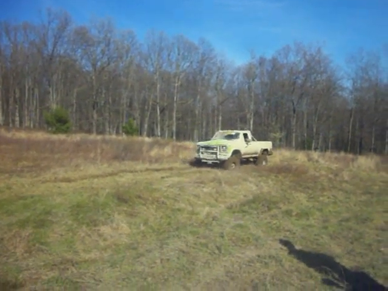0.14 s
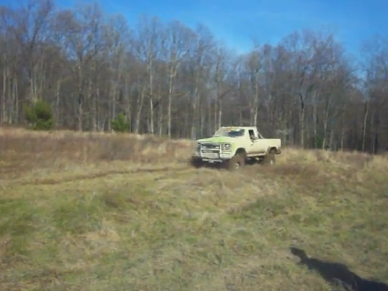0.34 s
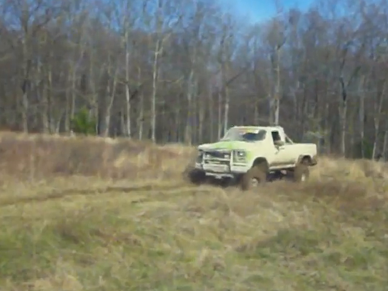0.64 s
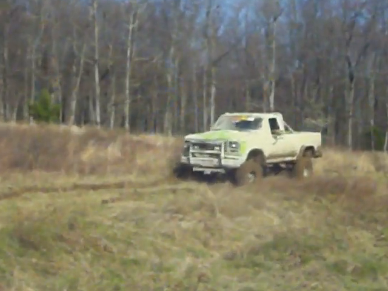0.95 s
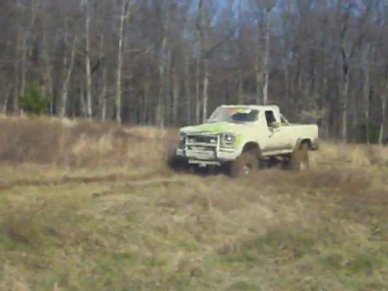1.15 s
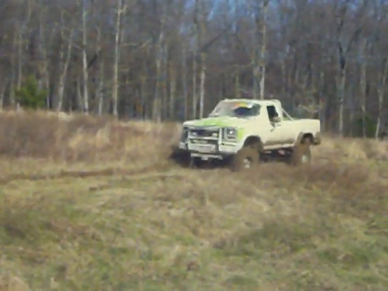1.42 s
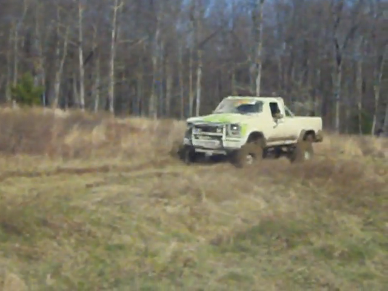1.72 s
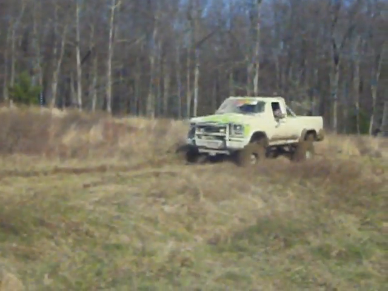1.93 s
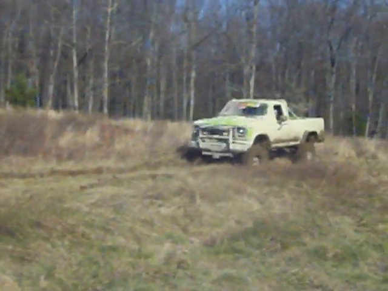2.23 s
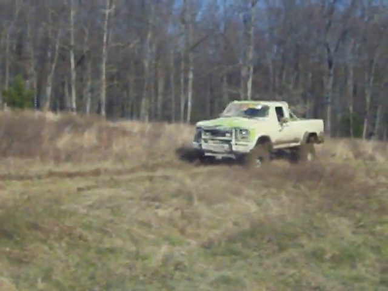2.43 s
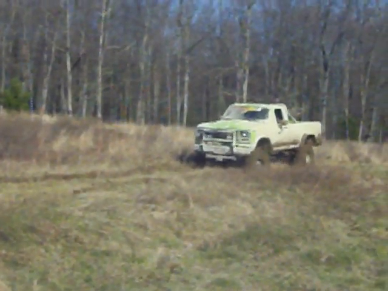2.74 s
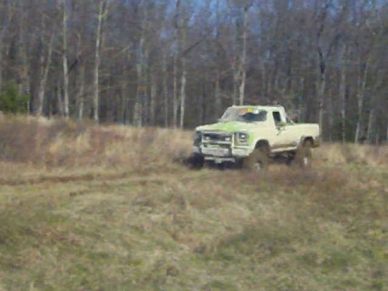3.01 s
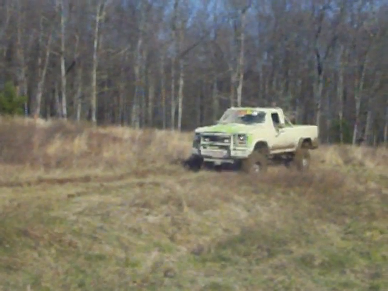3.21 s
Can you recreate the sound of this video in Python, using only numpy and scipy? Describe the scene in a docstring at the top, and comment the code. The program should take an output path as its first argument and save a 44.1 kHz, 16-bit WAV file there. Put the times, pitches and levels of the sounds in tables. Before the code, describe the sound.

A pickup's big engine revs once from idle and drops back, sputtering unevenly.

```python
"""A V8 pickup idles, is revved for a second and sinks back to a lumpy idle. Each firing sends a thump
and a rasp down the exhaust pipe, and one bank of cylinders spits through a leak.
A smaller engine drones nearby, slowly gaining speed and echoing off a line of trees.
A camera clicks three times. Underneath, fans and valves whirr and light wind rumbles on the microphone."""
import sys
import numpy as np
from scipy import signal
from scipy.fft import rfft, irfft
from scipy.io import wavfile

SR = 44100
rng = np.random.default_rng(int(sys.argv[2]) if len(sys.argv) > 2 else 0)


def persist_wave(psi):
    """Save psi, clipped to +-1, as 16-bit WAV."""
    counts = np.round(np.clip(psi, -1, 1) * 32767).astype(np.int16)
    wavfile.write(sys.argv[1], SR, np.atleast_2d(counts).T)


N = 148617
T = np.arange(N) / SR


def truck():
    """Each firing pushes out gas: a low thump, a rough rasp and, on the leaky side, a bright spit."""
    # how fast the V8 runs: (time [s], firings [per second])
    firing_rate = [(0, 29.2), (.79, 29.2), (.87, 62), (1, 73.3), (1.45, 74.43), (1.8, 75.14), (1.9, 73.7),
                   (2.1, 70.2), (2.42, 35.2), (2.55, 37.3), (2.7, 28.9), (3, 31.5), (3.37, 26)]
    # the eight firings of one cycle: (thump [dB], delay down the pipe [s], rasp [dB], spit [dB])
    cylinders = [(4, 0.0015, 3.5, 4), (1.5, 0.0014, -5, -20.5), (-1.5, 0.0032, -6.5, 6.5), (5, 0.002, 3, 5),
                 (0.5, 0.0017, -9.5, -20), (-0.5, 0.0021, 0.5, 3), (0.5, 0.0041, -4.5, -18.5),
                 (-4.5, .004, 0, -16.5)]
    # how loud each of the three sounds is: (time [s], level [dB])
    thump_level = [(0, -26), (.4, -25.5), (.78, -25.5), (.89, -15), (1.1, -19.5), (1.8, -19.5),
                   (1.95, -21.5), (2.1, -26.5), (2.3, -28.5), (2.7, -40.5), (3.37, -32.5)]
    rasp_level = [(0, -46.5), (.8, -45.5), (.86, -25), (.94, -24), (1.05, -28), (1.45, -29), (1.83, -32),
                  (2, -40), (2.25, -68.5), (2.6, -39), (3.37, -44)]
    spit_level = [(0, -47.5), (.6, -47.5), (.72, -43), (.795, -38.5), (.85, -32), (.9, -28), (1.15, -31),
                  (1.42, -31), (1.78, -31.5), (1.84, -33), (1.95, -39), (2.05, -52.5), (2.3, -53.5),
                  (2.53, -44.5), (2.7, -40), (2.78, -35), (2.88, -36.5), (2.97, -32), (3.04, -37),
                  (3.14, -38), (3.24, -33), (3.3, -38.5), (3.35, -31)]
    # the tone of each sound, from bass to treble: (frequency [Hz], level [dB])
    thump_colour = [(25, -39), (46, -11.5), (60, -11), (74, 3), (88, 4), (104, -3.5), (122, -11.5),
                    (148, -4), (178, -11), (222, -17.5), (252, -12), (300, -17), (400, -36.5), (600, -37.5),
                    (1500, -85.5)]
    rasp_colour = [(150, -12.5), (330, -21.5), (480, -8.5), (660, -3.5), (820, 5.5), (1000, -3),
                   (1500, 0.5), (2100, -5), (2600, -4.5), (4000, -13), (5800, -21.5), (7000, -55.5)]
    spit_colour = [(300, -37), (900, 2), (1800, 1), (2300, -6.5), (2800, 5), (3400, 5), (3800, -3.5),
                   (4300, 1.5), (4800, -3.5), (5600, -1.5), (6300, -23.5), (7000, -48)]
    rate = curve(firing_rate)
    at, number = firings(rate, start_s=.9405)
    thump_db, delay_s, rasp_db, spit_db = np.array(cylinders)[number % len(cylinders)].T
    pipe_exit = np.clip(at + (delay_s * SR).astype(int), 0, N - 1)
    # no two firings are equally strong, and the thumps vary most at slow speed
    luck = rng.standard_normal((len(at), 3)).T
    thump_scatter_db = np.interp(rate[at], [rate.min(), rate.max()], [1.2, .7])
    rasp_scatter_db, spit_scatter_db = 1.5, 1.1
    balance = np.sqrt(rate.mean() / rate)  # keeps faster firing from adding loudness by itself
    thump = balance * pulses(pipe_exit, thump_db + thump_scatter_db * luck[0])
    rasp_kicks = balance * pulses(pipe_exit, rasp_db + rasp_scatter_db * luck[1])
    spit_kicks = balance * pulses(at, spit_db + spit_scatter_db * luck[2])
    rasp = pipe(puffs(rasp_kicks, attack_s=.0012, decay_s=.0073))
    spit = puffs(spit_kicks, attack_s=.0018, decay_s=.0063)
    return (at_level(colour(thump, thump_colour), thump_level)
            + at_level(colour(rasp, rasp_colour), rasp_level)
            + at_level(colour(spit, spit_colour), spit_level))


def puffs(kicks, attack_s, decay_s):
    """Each kick lets out a puff of swirling gas: a hiss that swells quickly and dies away."""
    loudness = kicks
    for seconds in (attack_s, decay_s):
        loudness = signal.lfilter([1], [1, -np.exp(-1 / (seconds * SR))], loudness + 1e-18)
    return loudness * rng.standard_normal(N)


def pipe(x):
    """The exhaust pipe rings at its own pitches, which add to the sound passing through."""
    # where the pipe rings: (frequency [Hz], width [Hz], gain [factor])
    rings = [(746, 15, 0.85), (839.4, 43, 1.17), (1163, 31, 0.51), (1347, 32, 0.52), (1493, 30, 1.3),
             (1774, 53, 0.28), (2074, 48, 1.2), (3400, 67, 0.6), (4120, 81, 0.87)]
    return x + sum(gain * resonance(x, hz, width) for hz, width, gain in rings)


def small_engine():
    """Even exhaust pulses, smeared by a muffler, over a deep boom."""
    # how fast it runs: (time [s], firings [per second])
    firing_rate = [(0, 25.1), (.2, 25.2), (.41, 25.7), (.56, 27.7), (.85, 29), (1.15, 31.5), (1.41, 31),
                   (1.93, 33.1), (2.2, 33.2), (2.32, 33.8), (2.49, 35.5), (2.85, 37.9), (3.07, 39.3),
                   (3.37, 40.6)]
    # how loud the exhaust beat and the boom are: (time [s], level [dB])
    beat_level = [(0, -27.5), (.4, -29.5), (.6, -29), (1.2, -31), (2, -27.5), (2.3, -28), (2.6, -26),
                  (2.9, -28), (3.08, -29.5), (3.37, -28.5)]
    boom_level = [(0, -26.5), (.4, -29), (.7, -29.5), (2.1, -30), (2.38, -39), (2.55, -23.5), (2.75, -30.5),
                  (2.92, -28.5), (3.12, -36.5), (3.2, -30.5), (3.37, -28.5)]
    # the tone of the beat: (frequency [Hz], level [dB])
    beat_colour = [(25, -15), (35, -1.5), (50, -15), (66, -13.5), (80, -12), (101, -1), (133, 3), (165, -5),
                   (200, -7), (235, -13), (300, -11.5), (370, -25.5), (410, -38), (480, -35.5), (1200, -74)]
    scatter_db, boom_hz, boom_width_hz = .4, 77.1, 12.5
    at, _ = firings(curve(firing_rate), start_s=2.798)
    kicks = -pulses(at, scatter_db * rng.standard_normal(len(at)))
    beat = colour(kicks - kicks.mean(), beat_colour)
    smeared = beat - 2 * resonance(beat, hz=242.2, width_hz=70)  # delays this band, keeps its level
    boom = resonance(kicks, boom_hz, boom_width_hz)
    boom = resonance(boom, boom_hz, boom_width_hz)  # a second pass makes the note purer
    return at_level(tree_line(smeared), beat_level) + at_level(boom, boom_level)


def tree_line(x):
    """Trees send back late echoes that fill the gaps between pulses."""
    # the echoes: (delay [s], level [dB])
    echoes = [(.071, -10.5), (.118, -13)]
    return x + sum(from_db(db) * np.interp(T - delay_s, T, x, left=0) for delay_s, db in echoes)


def camera_clicks():
    """Each click rings the camera's body for a few milliseconds over a dull knock."""
    # the three clicks: (time [s], ring level [dB], knock level [dB])
    clicks = [(0.4507, 8.5, -6.5), (0.7475, 6, -7), (0.8719, 5, 2)]
    # the notes the body rings with: (frequency [Hz], level [dB], time to fade by 60 dB [s])
    body_notes = [(2250, -13, 0.0041), (2494, -0.5, 0.0092), (2650, -7.5, 0.0054), (3398, -2.5, 0.0058),
                  (3810, -13, 0.0078), (4200, -9, 0.0068), (4720, -12, 0.007)]
    knock_hz, knock_fade_s = 1240, .0048
    ring_lag_s, ring_rise_s = .0005, .000585
    out, t = np.zeros(N), T[:SR // 20]
    ring = sum(from_db(db - 60 * t / fade_s) * np.sin(2 * np.pi * hz * t)
               for hz, db, fade_s in body_notes)
    ring *= 1 - np.exp(-t / ring_rise_s)
    knock = from_db(-60 * t / knock_fade_s) * np.sin(2 * np.pi * knock_hz * t)
    for time_s, ring_db, knock_db in clicks:
        knock_at, ring_at = int(time_s * SR), int((time_s + ring_lag_s) * SR)
        out[knock_at:knock_at + len(t)] += from_db(knock_db) * knock
        out[ring_at:ring_at + len(t)] += from_db(ring_db) * ring
    return out


def whirr():
    """Fans and moving valve parts make a smooth noise under the firings."""
    # how loud the whirr is: (time [s], level [dB])
    whirr_level = [(0, -35), (.5, -36), (.8, -36.5), (1.3, -32.5), (1.95, -34), (2.25, -41), (2.7, -39),
                   (3.37, -38)]
    # its tone: (frequency [Hz], level [dB])
    whirr_colour = [(150, -1), (330, 2), (480, -6.5), (660, 2), (820, 0.5), (1100, 0), (1600, -0.5),
                    (2100, -6), (2500, -6), (3000, -8.5), (4200, -11), (5700, -17), (7000, -55.5)]
    ringing_noise = pipe(rng.standard_normal(N))
    return at_level(colour(ringing_noise, whirr_colour), whirr_level)


def wind():
    """Light gusts blow over the microphone and make a low rumble."""
    # how the gusts raise and lower the rumble: (time [s], level change [dB])
    gusts = [(0, -1), (.35, -1), (.55, 6), (.8, 3), (1.3, 0), (1.9, 2), (2.25, -2), (3.37, -1)]
    # the tone of the rumble: (frequency [Hz], level [dB])
    wind_colour = [(10, -3), (25, 1.5), (45, 1.5), (85, -2.5), (150, -7.5), (300, -16), (420, -20.5),
                   (700, -45.5)]
    base_db = -37.5
    rumble = colour(rng.standard_normal(N), wind_colour)
    return from_db(base_db) * at_level(rumble, gusts)


def firings(rate, start_s):
    """The sample where each firing falls, and its number, counted from 0 at start_s."""
    count = np.cumsum(rate) / SR
    number = np.floor(count - np.interp(start_s, T, count)).astype(int)
    at = np.flatnonzero(np.diff(number)) + 1
    return at, number[at]


def pulses(at, db):
    """Silence with one sharp kick at each given sample."""
    out = np.zeros(N)
    out[at] = from_db(db)
    return out


def resonance(x, hz, width_hz):
    """Let through a band around one pitch, with its centre at full strength."""
    r = np.exp(-np.pi * width_hz / SR)
    feedback = [1, -2 * r * np.cos(2 * np.pi * hz / SR), r * r]
    return (1 - r * r) / 2 * signal.lfilter([1, 0, -1], feedback, x)


def colour(x, points):
    """Shape the tone of a sound to follow (frequency [Hz], level [dB]) points."""
    size = 2 ** 18
    hz, db = np.transpose(points)
    freqs = np.maximum(np.arange(size // 2 + 1) * SR / size, 1)
    gain = from_db(np.interp(np.log(freqs), np.log(hz), db))
    # fold the filter in time so that it rings only after a kick, never before
    cepstrum = irfft(np.log(gain))
    cepstrum[1:size // 2] *= 2
    cepstrum[size // 2 + 1:] = 0
    return irfft(rfft(x, size) * np.exp(rfft(cepstrum)))[:N]


def at_level(x, rows):
    """Bring a sound to an average power of 1, then turn it up or down by (time [s], level [dB]) rows."""
    return from_db(curve(rows)) * x / np.sqrt(np.mean(x ** 2) + 1e-20)


def curve(rows):
    """Join (time [s], value) rows by straight lines."""
    return np.interp(T, *np.transpose(rows))


def from_db(db):
    """Turn decibels into a number to multiply by."""
    return 10 ** (np.asarray(db) / 20)


def scene():
    """All sources add up at one microphone."""
    return (truck() + small_engine() + camera_clicks() + whirr() + wind())[None]


def record(dry):
    """The loudest peaks are rounded off and the highest treble is cut."""
    cutoff_hz = 6850
    rounded = dry / (1 + dry ** 4) ** .25
    treble_cut = signal.ellip(10, .3, 85, cutoff_hz, fs=SR, output="sos")
    return signal.sosfilt(treble_cut, rounded)


dry = scene()
out = record(dry)
persist_wave(out)
```